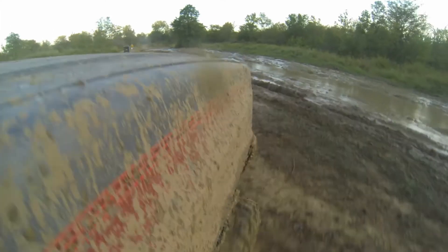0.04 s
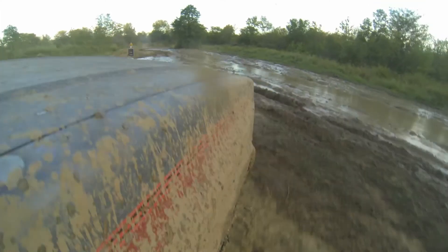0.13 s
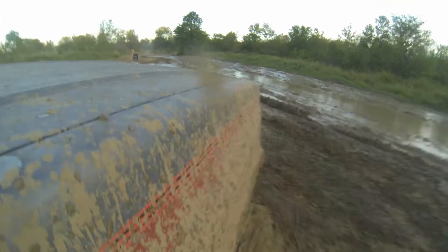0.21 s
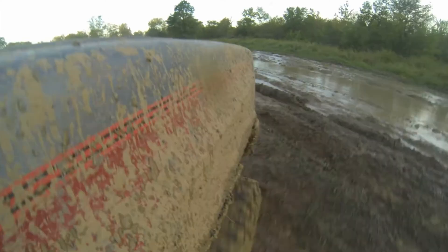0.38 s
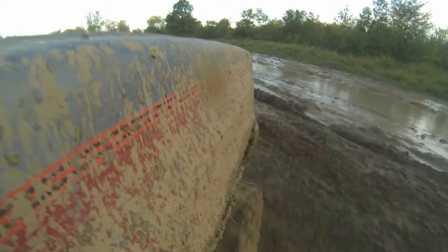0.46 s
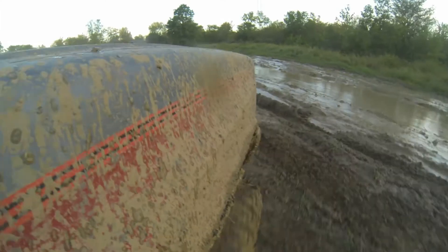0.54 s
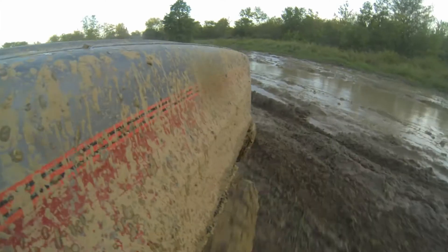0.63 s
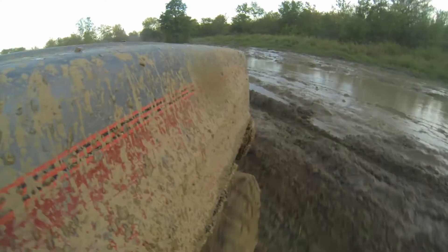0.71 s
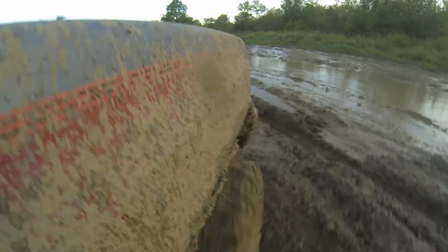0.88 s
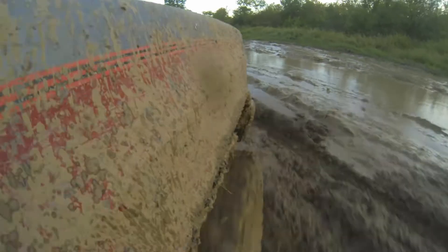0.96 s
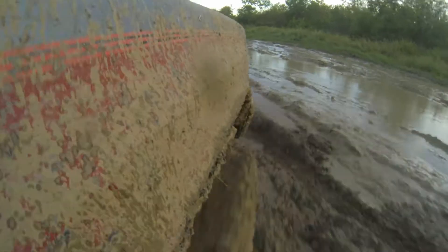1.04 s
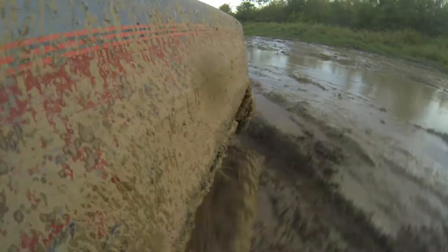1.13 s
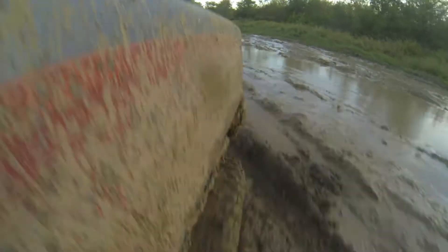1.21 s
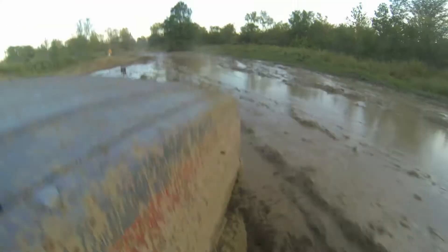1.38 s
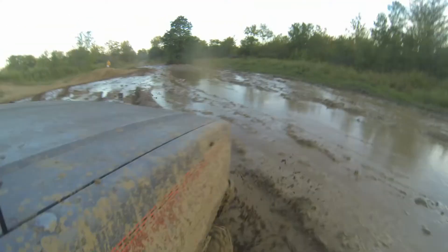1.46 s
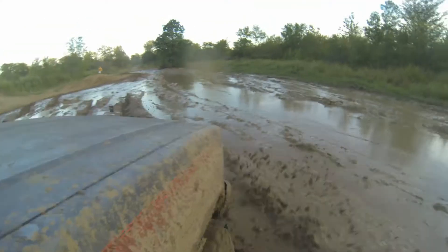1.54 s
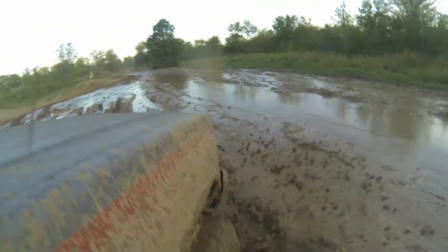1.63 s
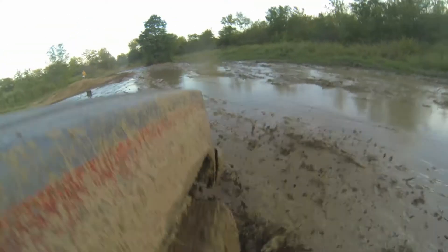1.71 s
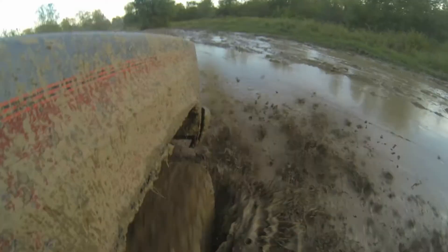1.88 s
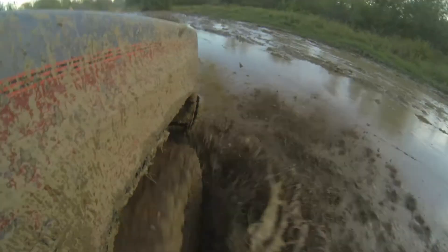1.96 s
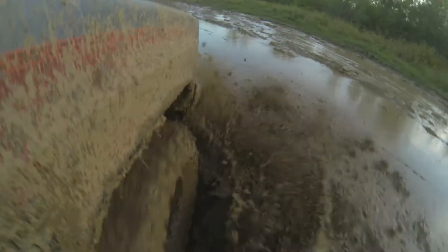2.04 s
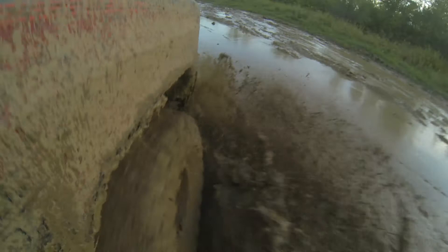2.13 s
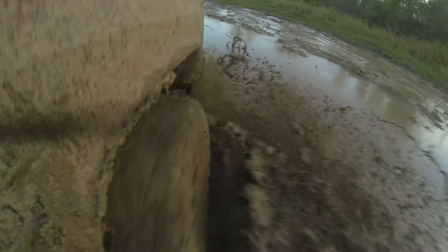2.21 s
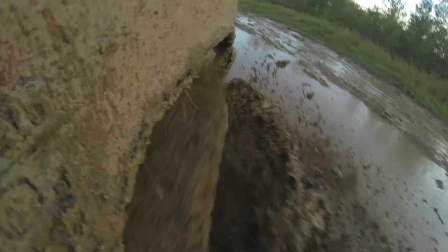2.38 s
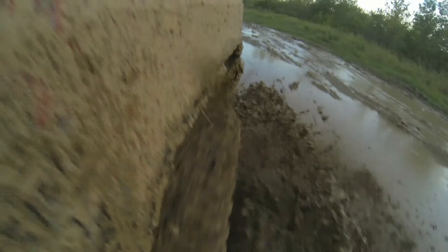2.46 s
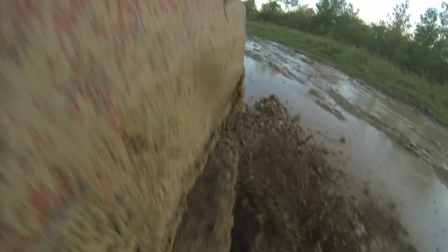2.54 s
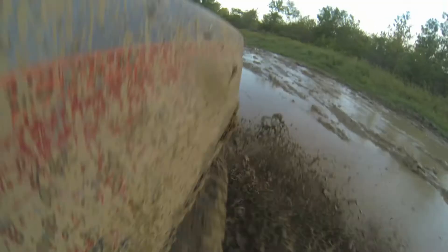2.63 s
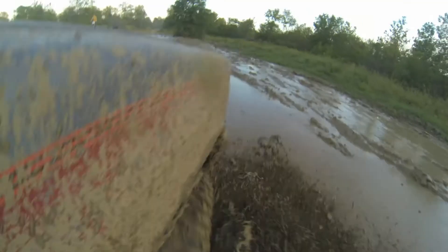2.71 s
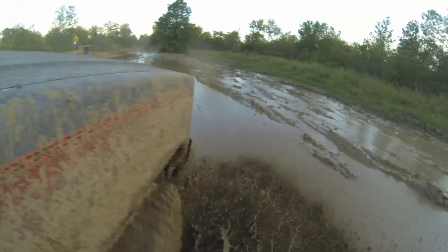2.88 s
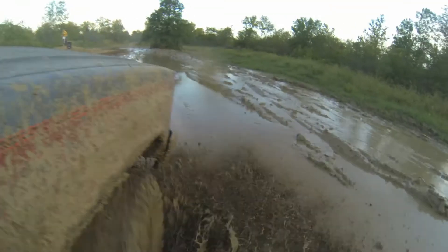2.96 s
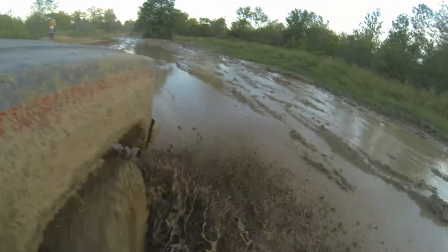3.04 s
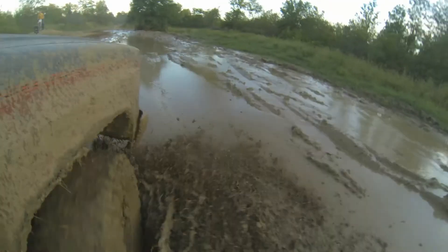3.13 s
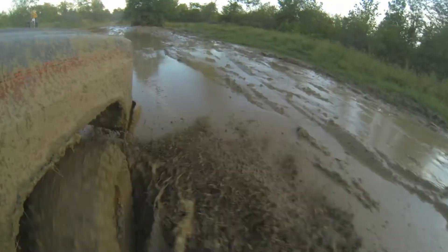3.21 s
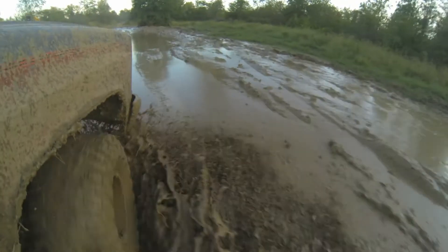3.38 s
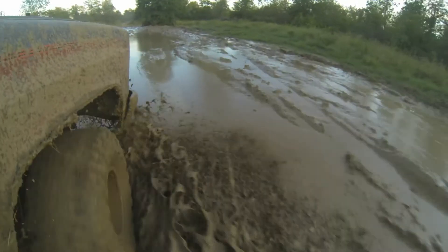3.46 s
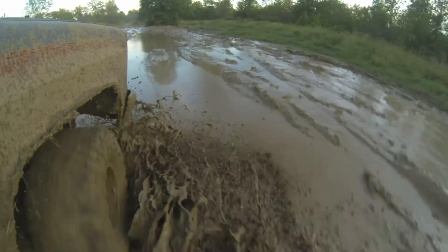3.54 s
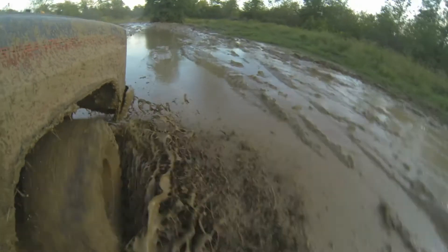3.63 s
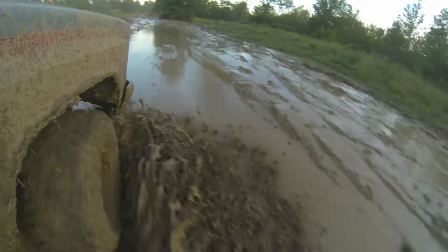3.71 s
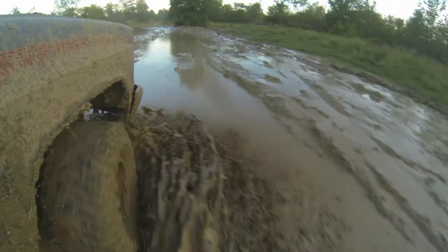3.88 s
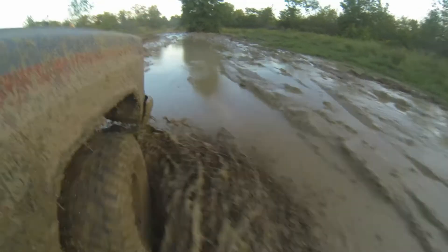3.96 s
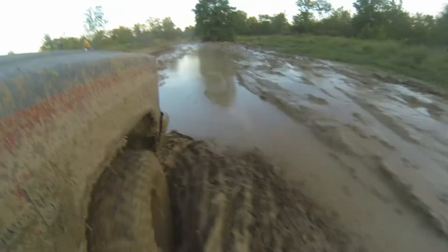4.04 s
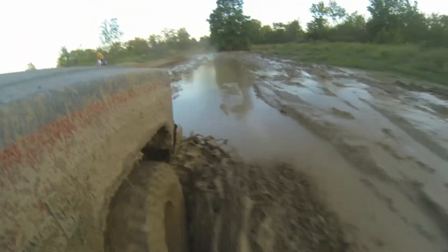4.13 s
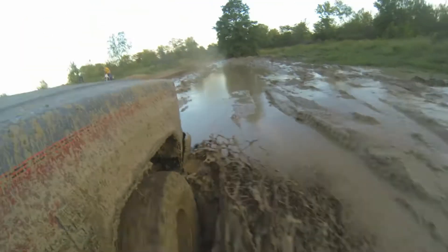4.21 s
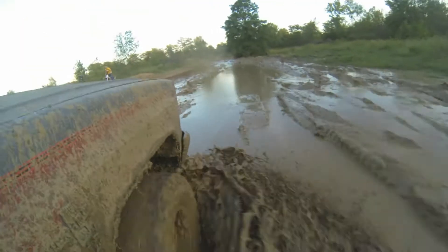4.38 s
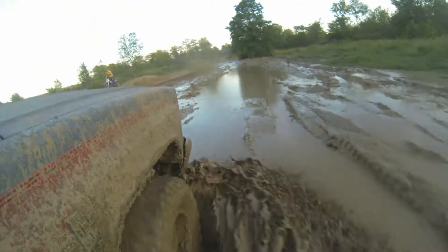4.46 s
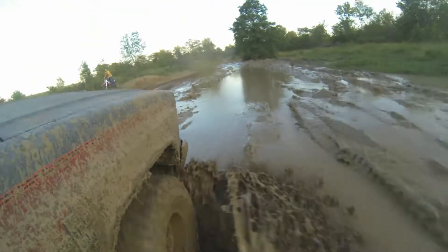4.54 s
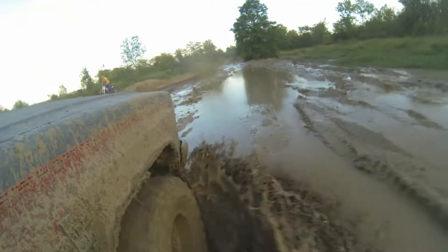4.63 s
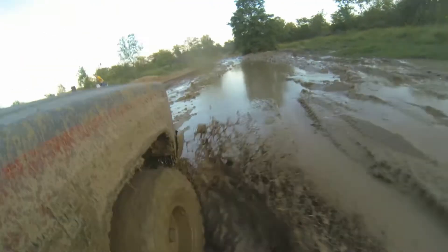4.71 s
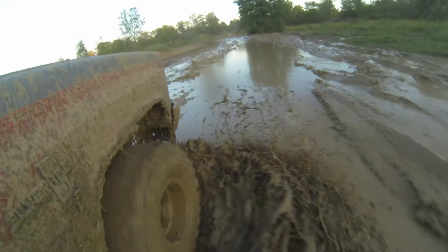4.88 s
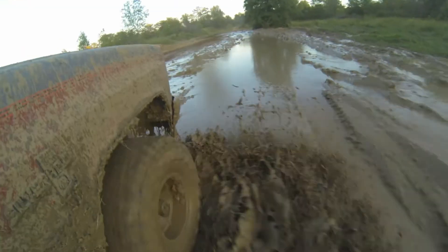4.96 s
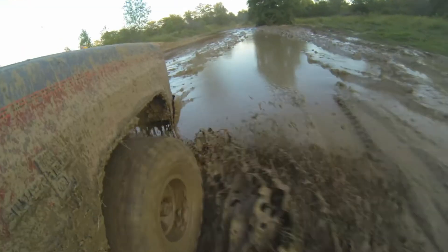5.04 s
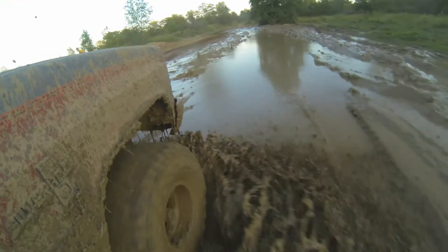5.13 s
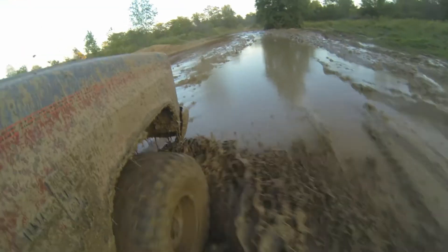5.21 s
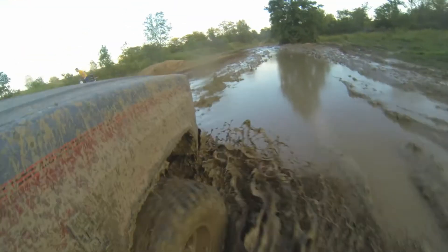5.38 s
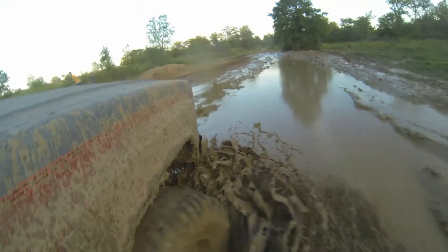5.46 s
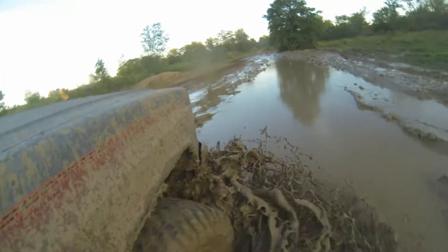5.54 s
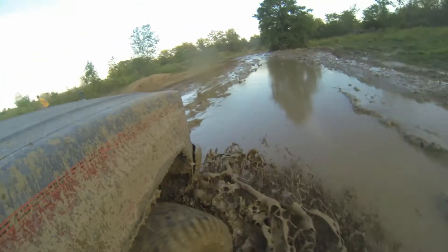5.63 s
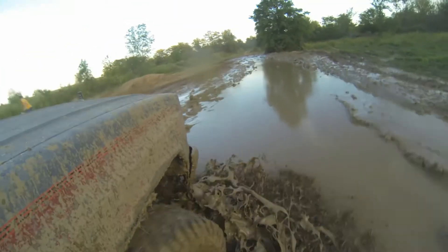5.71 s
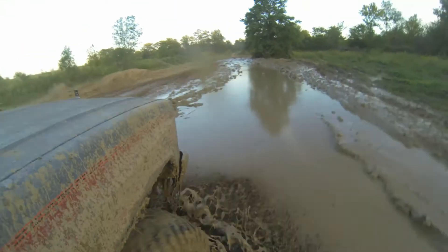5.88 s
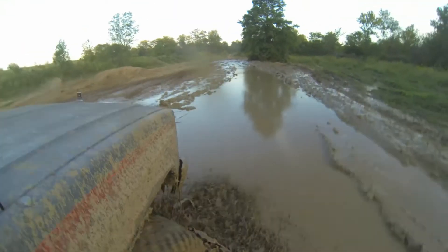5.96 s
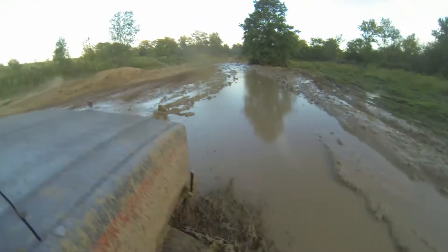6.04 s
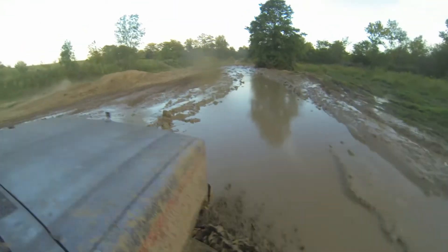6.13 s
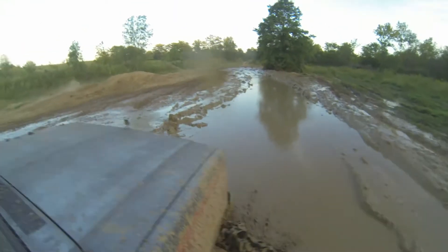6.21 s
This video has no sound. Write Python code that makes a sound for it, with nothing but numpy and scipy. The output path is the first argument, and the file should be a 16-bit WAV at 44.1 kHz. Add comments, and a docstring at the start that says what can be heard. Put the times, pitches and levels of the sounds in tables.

```python
"""In a mud pit, a cased microphone fixed to the side of a V8 truck: close exhaust, case and bodywork.
First the truck idles with a loping beat, and a thin whistle, likely a belt, chirps once a cycle, then fades.
From 1.7 s the revs rise three times: harmonics of the firing boom and burble, and clicks buzz in the case.
Filtered clicks make the mud and water flung by the tyres, ringing blows the knocks, low noise the ruts.
After the long second pull, at 5.3 s, a hollow drone of upper firing harmonics swells briefly; the third rev follows."""
import sys
import numpy as np
from scipy import signal
from scipy.fft import rfft, irfft
from scipy.io import wavfile
from scipy.ndimage import uniform_filter1d

SR = 44100
rng = np.random.default_rng(int(sys.argv[2]) if len(sys.argv) > 2 else 0)


def transcribe(signal):
    """Save signal, clipped to [-1, 1], as a 16-bit WAV file at the path in sys.argv[1]."""
    frames = np.atleast_2d(signal).T
    limited = np.clip(frames, -1, 1)
    pcm = np.round(limited * 32767).astype(np.int16)
    wavfile.write(sys.argv[1], SR, pcm)


N = 277830
TIME = np.arange(N) / SR  # s

# dull whir of the engine bay: [f/Hz, relative level/dB]
WHIR_SPECTRUM = [(120, -22), (200, 3.5), (280, -5.5), (380, -2), (480, -10.5), (800, -16.5), (2000, -34),
                 (6000, -46), (11500, -70), (13200, -37), (15000, -50)]
# body rumble over the ruts: [f/Hz, relative level/dB]
RUMBLE_SPECTRUM = [(8, -17.5), (16, 3), (24, 2), (38, 1), (52, -13), (100, -10.5), (300, -64), (3000, -120)]
# mud-soaked tyre carcass and wheel arch: [f/Hz, relative level/dB]
ARCH_RESPONSE = [(100, -30), (220, 0), (300, -2), (400, -1.5), (550, -8.5), (900, -9.5), (2000, -42),
                 (8000, -95)]
# the tyre slaps into deeper ruts: [t/s, spread in time/s, level/dB]
RUT_SLAPS = [(0.21, 0.077, -42.5), (1.27, 0.023, -35), (2.177, 0.067, -32), (2.31, 0.02, -27.5),
             (2.88, 0.052, -45), (3.135, 0.044, -39), (5.623, 0.02, -48), (6.22, 0.14, -33)]
# air pockets that gulp shut in the mud: [t/s, starting f/Hz, peak level/dB]
AIR_GULPS = [(2.738, 670, -29.5), (2.93, 850, -37), (5.485, 730, -34), (5.6, 591, -32)]
# sheets of water thrown over the bodywork: [t/s, spread in time/s, spatter level/dB]
WATER_SHEETS = [(1.01, 0.018, -52), (1.516, 0.022, -44.5), (1.93, 0.015, -37), (2.14, .025, -34.5),
                (2.317, 0.035, -37), (2.857, 0.062, -38.5), (3.11, 0.053, -37.5), (4.96, 0.045, -39),
                (5.466, 0.041, -34), (5.677, 0.069, -33), (5.816, 0.023, -35)]
# churned mud as heard through the case: [f/Hz, relative level/dB]
MUD_SPECTRUM = [(200, -33.5), (600, -8.5), (1000, -9), (1500, -1.5), (1880, -9), (2200, 2.5), (2500, -4.5),
                (2900, -3), (3450, 1), (3800, -9), (4300, -20.5), (4900, -9), (5600, -26), (9000, -38)]
# fine spray: [f/Hz, relative level/dB]
SPRAY_SPECTRUM = [(2500, -21), (4300, -4), (4950, 9.5), (5900, 4), (6500, 5), (8000, 2), (9300, -3),
                  (11000, -3), (11900, -12), (13200, -6.5), (14200, -18), (15200, -23)]
# going under the tyres, throttle open: [t/s, mud level/dB, case buzz level/dB], before each layer's trim
GROUND_GOING = [(0.0, -45, -34.5), (0.22, -41.5, -27), (0.42, -42, -33), (0.94, -41.5, -33.5),
                (1.03, -36, -27), (1.42, -34, -25.5), (1.68, -28.5, -23.5), (1.88, -31, -24.5),
                (2.06, -26, -17), (2.47, -30, -23), (2.63, -23.5, -17.5), (2.75, -27, -20.5),
                (3.12, -22.5, -17), (3.35, -27, -19), (4.1, -24.5, -19.5), (4.85, -28.5, -21.5),
                (5.1, -28.5, -20.5), (5.27, -21, -10.5), (5.45, -25.5, -16.5), (5.8, -23, -16),
                (6.3, -24.5, -20)]
# clods and jolts on the bodywork: [t/s, peak level/dB before the trim, splash level/dB against the knock]
BODY_KNOCKS = [(0.1507, -21.5, -8), (1.249, -15, -6), (1.282, -17.5, -6.5), (1.298, -14.5, -19),
               (1.755, -15.5, -13), (1.9925, -9, -5.5), (2.2152, -7, -10.5), (3.1373, -15, 3),
               (3.1865, -5.5, -22), (3.677, -9, -26), (4.29, -15, -20), (5.6188, -7, -11),
               (5.724, -12, -14), (5.9753, -10, -21), (6.0705, -7, -28), (6.113, -7.5, -16),
               (6.196, -6, -10), (6.247, -5, -16)]
# response of the case to shake: [f/Hz, relative level/dB]
CASE_RESPONSE = [(100, -27.5), (250, -17.5), (400, -22), (520, -27), (900, -23.5), (1100, -15),
                 (1280, -5.5), (1400, -1), (1490, 1), (1600, -6), (1750, -14.5), (1900, -26.5),
                 (3000, -26.5), (12000, -85)]
# partials of the hollow drone: [multiple of the firing rate, relative level/dB]
HOLLOW_PARTIALS = [(3, 0), (4, -5), (5, -12), (6, -30), (8, -15)]
# engine speed: [t/s, firing rate f/Hz]
ENGINE_SPEED = [(0.0, 69.4), (0.95, 70.4), (1.2, 66), (1.82, 70.7), (2.24, 104.9), (2.41, 110.5),
                (2.58, 71.8), (2.69, 67.9), (2.82, 86.4), (2.99, 87), (3.16, 105.7), (3.6, 119.2),
                (4.0, 124), (4.3, 122), (4.68, 126), (5.06, 103.1), (5.32, 67.7), (5.62, 69.4),
                (5.83, 97.4), (6.3, 128.1)]
# pushes of the throttle: [press t/s, release t/s, opening 0-1]
THROTTLE_PUSHES = [(1.74, 2.353, 0.96), (2.62, 5.03, 0.99), (5.315, 5.517, 0.68), (5.54, 6.35, 0.66)]
# uneven firing of the two cylinder banks: [multiple of the cycle rate, relative level/dB]
UNEVEN_PARTIALS = [(5, -1), (6, -11), (7, -5.5), (9, -10), (10, -26), (11, -6.5), (12, -7), (13, 0.5),
                   (14, -16), (16, -1.5), (19, -4), (21, -2), (24, -9), (27, -10), (28, -6), (29, -8),
                   (30, -9.5), (37, -9.5), (39, -11.5)]
# exhaust pipe response: [f/Hz, relative level/dB]
PIPE_RESPONSE = [(35, -3), (70, -1), (125, 5.5), (200, -5.5), (250, -11), (345, -22), (430, -7.5),
                 (510, -13), (600, -6), (900, -22), (2000, -51), (6000, -110)]
# the idle lope deepens as the truck rolls into the pit: [t/s, level/dB]
IDLE_LOPE = [(0.0, -23.5), (0.5, -20.5), (1.6, -16.5)]

FIRINGS_PER_CYCLE = 8
PRESS_S, RELEASE_S = 0.18, 0.14
CRUISE_HZ = 115.7  # firing rate
BOOM_DB, BOOM_LOAD_DB, BOOM_DB_PER_HZ = -26.5, 10.5, 0.04  # the boom grows as the revs near the pipe's resonance
BURBLE_DB, BURBLE_LOAD_DB = -37, 7.5
LUG_DB_PER_HZ = 0.0348  # under load the burble grows as the engine labours below cruise
RUMBLE_DB, RUMBLE_DB_PER_HZ = -29, 0.11  # level at cruise; the body shudders more at low revs
MUD_COAST_DB, BUZZ_COAST_DB = -7, -6  # change when the throttle shuts and the tyres stop spinning
SPRAY_DB, SPRAY_GROWTH, SPRAY_FROM_DB = -38, 1.01, -26  # level at this untrimmed mud level, dB per dB of mud
OVERRUN_AT_S, OVERRUN_SPREAD_S, OVERRUN_DB, OVERRUN_BOOM_DB = 5.3, 0.069, -29, 1
WHISTLE_DB, WHISTLE_DAMPED_S, WHISTLE_FADE_DB_PER_S = -54, 1.25, 9
TOP_HZ = 14800  # upper limit of the microphone


def undb(db):
    """Decibels to gain."""
    return 10 ** (np.asarray(db) / 20)


def unit(x):
    """Scale to rms 1."""
    return x / np.sqrt(np.mean(x ** 2))


def curves(table):
    """Each column of a time table, sample by sample."""
    s, *columns = np.transpose(table)
    return [np.interp(TIME, s, column) for column in columns]


def response(points, hz):
    """Decibels of a spectrum at the given frequencies, joined along a log frequency axis."""
    f, db = np.transpose(points)
    return np.interp(np.log(np.maximum(hz, 1)), np.log(f), db)


def colour(x, points):
    """Causal (minimum-phase) filter with the given spectrum, so that clicks ring after they strike."""
    size = 2 ** 19
    bins_hz = np.arange(size // 2 + 1) * SR / size
    cepstrum = irfft(np.log(undb(response(points, bins_hz))))
    # fold the cepstrum onto positive time
    cepstrum[1:size // 2] *= 2
    cepstrum[size // 2 + 1:] = 0
    return irfft(rfft(x, size) * np.exp(rfft(cepstrum)))[:N]


def walk(rate):
    """Smooth chance that changes about rate times a second; rms 1."""
    hold = max(int(SR / rate), 1)
    steps = np.repeat(rng.standard_normal(N // hold + 1), hold)
    return unit(uniform_filter1d(steps, hold)[:N])


def grains(per_s, scatter_db):
    """Random clicks of either sign; their sizes scatter, and a positive scatter makes a few large."""
    hit = rng.random(N) < per_s / SR
    size = undb(scatter_db * np.minimum(rng.exponential(size=N), 4))
    return unit(hit * size * rng.choice([-1, 1], N))


def swell_at(s, spread_s):
    """A smooth bell-shaped rise and fall around a moment."""
    return np.exp(-0.5 * ((TIME - s) / spread_s) ** 2)


def firings(turns, scatter_db):
    """One pulse per firing, each of its own strength."""
    fired = np.diff(np.floor(turns), prepend=0) > 0
    return fired * undb(scatter_db * rng.standard_normal(N))


def throb(turns, at, depth_db):
    """Gain that swells once per engine cycle, peaking at the given share of the cycle."""
    return undb(depth_db * np.cos(2 * np.pi * (turns / FIRINGS_PER_CYCLE - at)))


def idling(hz):
    """1 at tick-over, 0 once the revs are up."""
    return np.clip((90 - hz) / 18, 0, 1)


def throttle():
    """Each push opens quickly, holds and shuts; 0 closed, 1 wide open."""
    pushes = []
    for press, release, opening in THROTTLE_PUSHES:
        opened = np.clip((TIME - press) / PRESS_S, 0, 1)
        held = np.clip(1 - (TIME - release) / RELEASE_S, 0, 1)
        pushes.append(opening * opened * held)
    return np.max(pushes, axis=0)


def whir(db=-45):
    """A soft, wavering rush of fan air, as filtered noise behind everything."""
    return unit(colour(rng.standard_normal(N), WHIR_SPECTRUM)) * undb(db + 3.4 * walk(9))


def rumble(hz, turns, rumble_db):
    """The body shudders over the ruts as low noise and rocks with the idling engine."""
    rock = np.sin(2 * np.pi * 3 / FIRINGS_PER_CYCLE * turns)
    ruts = unit(colour(rng.standard_normal(N), RUMBLE_SPECTRUM))
    return ruts * undb(rumble_db) + undb(-19.5) * idling(hz) * rock


def airy_tone(hz, width_hz):
    """A narrow band of hiss around a moving pitch."""
    phase = 2 * np.pi * np.cumsum(hz) / SR
    lowpass = signal.butter(2, width_hz / 2, fs=SR, output="sos")
    a, b = signal.sosfilt(lowpass, rng.standard_normal((2, N)))
    return unit(a * np.cos(phase) + b * np.sin(phase))


def whistle(hz, turns, chirp_at=0.59, chirp_cycles=0.093, chirp_db=7.0,
            low_hz=6680, chirp_hz=7750, top_hz=10250):
    """A thin idle whistle that sways and chirps higher once a cycle; it fades once the truck is in the water."""
    # share of a cycle before (-) or after (+) the chirp, slightly unsteady
    cycle = (turns / FIRINGS_PER_CYCLE - chirp_at + 0.03 * walk(9) + 0.5) % 1 - 0.5
    sway = -np.tanh(cycle / 0.094) * np.cos(np.pi * cycle)
    chirp = np.exp(-0.5 * (cycle / chirp_cycles) ** 2) * undb(chirp_db + 0.63 * walk(10.1))
    steady = airy_tone(low_hz + 330 * sway, width_hz=510)
    high = airy_tone(chirp_hz - 100 * sway, width_hz=490)
    high += undb(-21.0) * airy_tone(top_hz + 100 * sway, width_hz=430)
    db = WHISTLE_DB - WHISTLE_FADE_DB_PER_S * np.maximum(TIME - WHISTLE_DAMPED_S, 0)
    return idling(hz) * undb(db) * (steady + chirp * high)


def slaps():
    """Dull, lumpy surges of mud against the wheel arch: sparse clicks through its low resonance."""
    surge = sum(undb(db) * swell_at(s, spread_s) for s, spread_s, db in RUT_SLAPS)
    return surge * unit(colour(grains(per_s=700, scatter_db=3), ARCH_RESPONSE))


def gulps(ring_s=0.013, rise=0.32):
    """Each air pocket sounds a short, slightly rising note as it shuts."""
    out = np.zeros(N)
    for s, hz, db in AIR_GULPS:
        age = np.maximum(TIME - s, 0)
        envelope = age / ring_s * np.exp(1 - age / ring_s)
        out += undb(db) * envelope * np.sin(2 * np.pi * hz * age * (1 + rise * age))
    return out


def sheets(gob_db=7):
    """Thrown water lands as coarse, separate spatter with heavier gobs in it."""
    fall = sum(undb(db) * swell_at(s, spread_s) for s, spread_s, db in WATER_SHEETS)
    drops = grains(per_s=3500, scatter_db=1.5) * undb(5 * walk(150))
    spatter = unit(colour(drops, SPRAY_SPECTRUM))
    gobs = unit(colour(drops, MUD_SPECTRUM))
    return fall * (spatter + undb(gob_db) * gobs)


def splats(per_s, low_hz=1900, high_hz=3700, ring_s=0.0057):
    """Single drops slap the panel, each with its own pitch and a brief decaying ring."""
    out, age = np.zeros(N + 512), np.arange(512) / SR
    for when, pitch, size in rng.random((int(per_s * N / SR), 3)):
        start, hz = int(when * N), low_hz + pitch * (high_hz - low_hz)
        ring = np.exp(-age / ring_s) * np.sin(2 * np.pi * hz * age)
        out[start:start + len(age)] += undb(18 * size) * ring
    return unit(out[:N])


def mud(turns, mud_db, spray_db):
    """Gobs and drops off the tyre, in clumps that throb with the engine; the fine spray trails the gobs."""
    flutter = undb(1.3 * np.cos(2 * np.pi * 3 / FIRINGS_PER_CYCLE * turns) + np.cos(2 * np.pi * turns))
    gob_clicks = flutter * undb(1.7 * walk(70)) * grains(per_s=4500, scatter_db=2.4)
    drop_clicks = flutter * undb(0.94 * walk(45)) * grains(per_s=4000, scatter_db=-3.0)
    gobs = unit(colour(gob_clicks, MUD_SPECTRUM))
    drops = unit(colour(drop_clicks, SPRAY_SPECTRUM))
    heavy = (gobs + undb(-9.5) * splats(per_s=170)) * throb(turns, at=0.35, depth_db=2.0)
    fine = drops * throb(turns, at=0.75, depth_db=2.0)
    return heavy * undb(mud_db + 0.42) + fine * undb(spray_db)  # mud trim +0.42 dB


def knocks(ring_s=0.00237, splash_s=0.01):
    """Each blow rings briefly in the case and is followed by a short wet splash."""
    blow, splash = np.zeros(N), np.zeros(N)
    for s, db, splash_db in BODY_KNOCKS:
        age = np.maximum(TIME - s + ring_s / 2, 0)
        swell = age / ring_s * np.exp(1 - age / ring_s)
        ring_hz = 1470 * (1 + 0.032 * rng.standard_normal())
        blow += undb(db) * swell * np.sin(2 * np.pi * ring_hz * age)
        splash += undb(db + splash_db) * (1 - np.exp(-age / ring_s)) * np.exp(-age / splash_s)
    wet = unit(colour(grains(per_s=7900, scatter_db=0.0), MUD_SPECTRUM))
    wet += undb(-13.0) * unit(colour(rng.standard_normal(N), SPRAY_SPECTRUM))
    return undb(-2) * (blow + splash * wet)  # trim -2 dB


def buzz(turns, buzz_db):
    """Firings and loose chatter shake the case, which rings briefly near 1.5 kHz."""
    beats = unit(firings(turns, scatter_db=3.5) * rng.choice([-1, 1], N))
    chatter = grains(per_s=1800, scatter_db=1.0) * undb(0.67 * walk(35))
    shake = unit(colour(chatter + undb(-13) * beats, CASE_RESPONSE))
    return shake * throb(turns, at=0.36, depth_db=0.93) * undb(buzz_db - 0.6)  # trim -0.6 dB


def overrun(turns):
    """As the engine runs down, upper harmonics of the firing swell into a hollow drone."""
    drone = 0
    for k, db in HOLLOW_PARTIALS:
        drone += np.sin(2 * np.pi * round(k) * turns) * undb(db + 2 * walk(36))
    return drone * undb(OVERRUN_DB) * swell_at(OVERRUN_AT_S, OVERRUN_SPREAD_S)


def exhaust(hz, turns, boom_db, burble_db, lope_at=0.43):
    """A clean boom at the firing rate; unequal cylinders add a growl under load and a lope at idle."""
    cycle, cycle_hz = turns / FIRINGS_PER_CYCLE, hz / FIRINGS_PER_CYCLE
    idle = idling(hz)
    boom = np.sqrt(2) * np.sin(2 * np.pi * turns) * undb(boom_db + 0.14 * walk(25))
    growl = 0
    for k, db in UNEVEN_PARTIALS:
        # the long pipe smears the higher partials out of step
        phase = 2 * np.pi * (round(k) * cycle + (k > 10) * rng.random())
        growl += np.cos(phase) * undb(db + response(PIPE_RESPONSE, k * cycle_hz) + 2.3 * walk(12))
    # once a cycle a strong pair of firings swells the pipe's low resonance
    swell = np.exp(1.5 * (np.cos(2 * np.pi * (cycle - lope_at)) - 1))
    note = np.sin(2 * np.pi * (14 * cycle + walk(9) / 10))
    overtone = swell * np.sin(2 * np.pi * (23 * cycle + walk(25) / 5))
    lope_db, = curves(IDLE_LOPE)
    lope = swell * (note + undb(-16) * overtone) * undb(lope_db + 1.1 * walk(8.2))
    # no two charges burn alike: noisy firings over a little steady hiss
    charges = firings(turns, scatter_db=3.0) * rng.standard_normal(N)
    rough = unit(colour(charges + 0.015 * rng.standard_normal(N), PIPE_RESPONSE))
    burble = undb(burble_db) * (growl * undb(3.5 - 3.7 * idle) + undb(-5.5 - 2 * idle) * rough)
    boom *= throb(turns, at=0.84, depth_db=1.6)
    burble *= throb(turns, at=0.95, depth_db=1.5 * (1 - idle))
    return boom + idle * lope + burble


def scene():
    """Engine speed times the pulses, the throttle drives exhaust and wheelspin; all reach one microphone."""
    hz, = curves(ENGINE_SPEED)
    turns = np.cumsum(hz) / SR  # firings so far
    load = throttle()
    slow_hz = CRUISE_HZ - hz

    boom_db = BOOM_DB + BOOM_LOAD_DB * load - BOOM_DB_PER_HZ * slow_hz
    boom_db += OVERRUN_BOOM_DB * swell_at(OVERRUN_AT_S, OVERRUN_SPREAD_S)
    burble_db = BURBLE_DB + (BURBLE_LOAD_DB + LUG_DB_PER_HZ * slow_hz) * np.sqrt(load)
    rumble_db = RUMBLE_DB + RUMBLE_DB_PER_HZ * slow_hz
    churn_db, shake_db = curves(GROUND_GOING)
    mud_db = churn_db + MUD_COAST_DB * (1 - load)
    buzz_db = shake_db + BUZZ_COAST_DB * (1 - load)
    spray_db = SPRAY_DB + SPRAY_GROWTH * (mud_db - SPRAY_FROM_DB)

    background = whir() + rumble(hz, turns, rumble_db) + whistle(hz, turns)
    ground = slaps() + gulps() + sheets() + mud(turns, mud_db, spray_db) + knocks()
    engine = buzz(turns, buzz_db) + overrun(turns) + exhaust(hz, turns, boom_db, burble_db)
    return (background + ground + engine)[None]


def record(dry):
    """The microphone rounds the highest peaks and cuts the top octave short."""
    rounded = dry / (1 + (dry / 0.9) ** 8) ** (1 / 8)
    return signal.sosfilt(signal.ellip(8, 0.2, 80, TOP_HZ, fs=SR, output="sos"), rounded)


dry = scene()
out = record(dry)
transcribe(out)
```